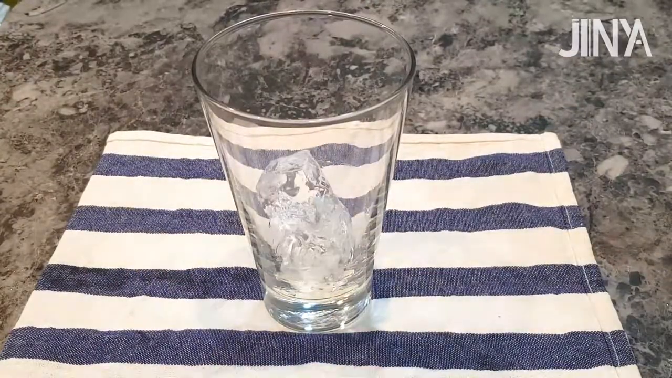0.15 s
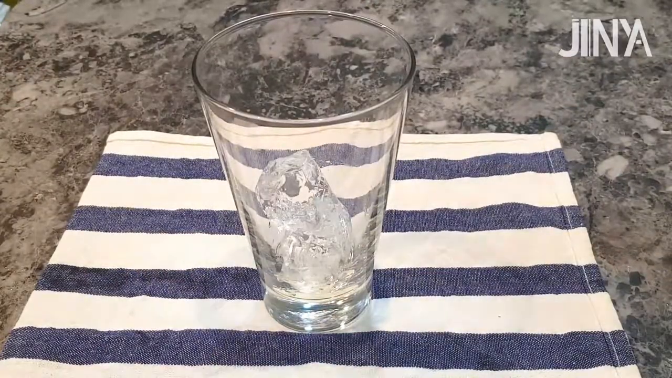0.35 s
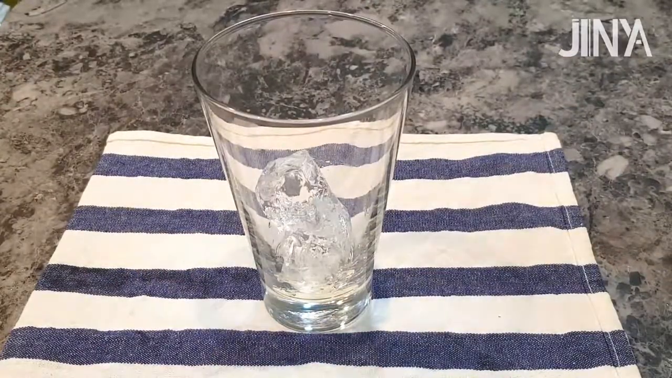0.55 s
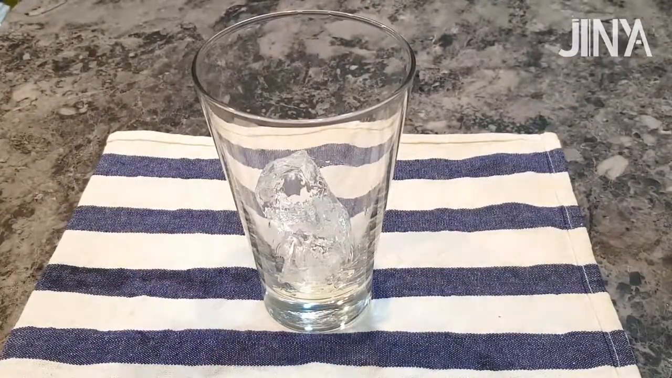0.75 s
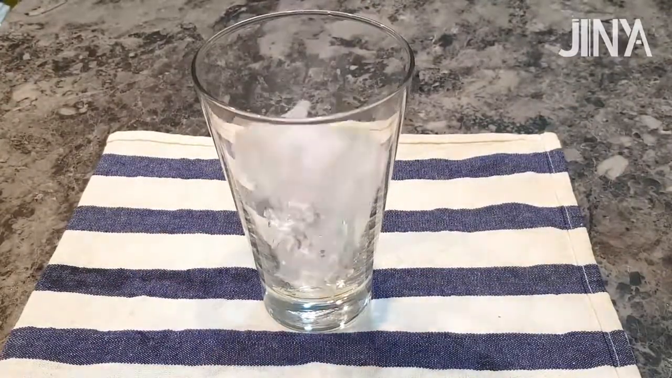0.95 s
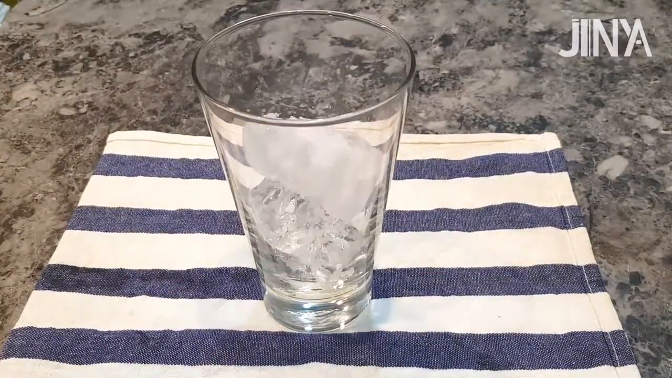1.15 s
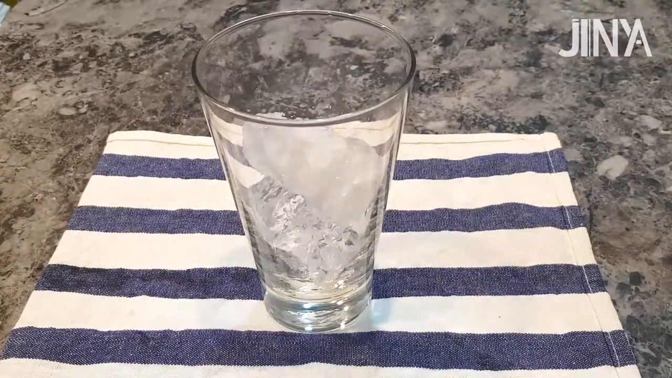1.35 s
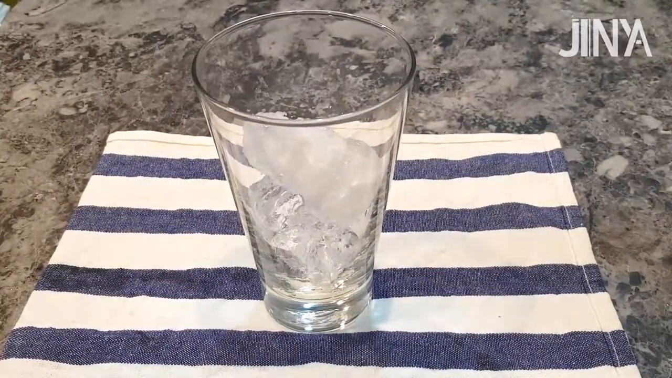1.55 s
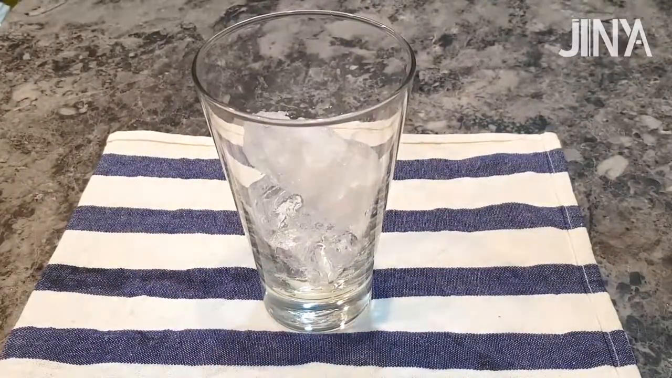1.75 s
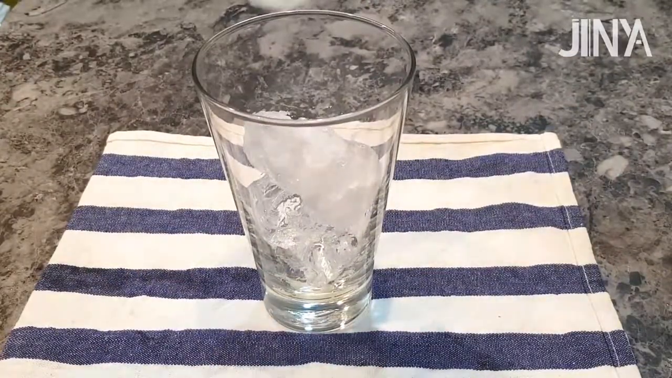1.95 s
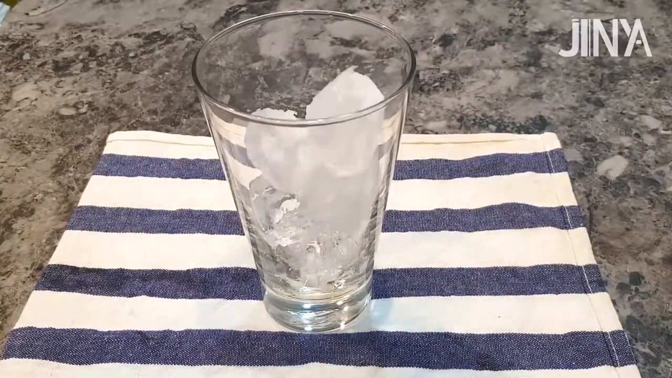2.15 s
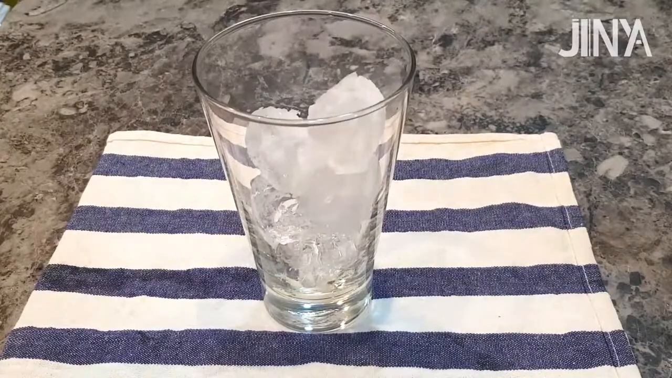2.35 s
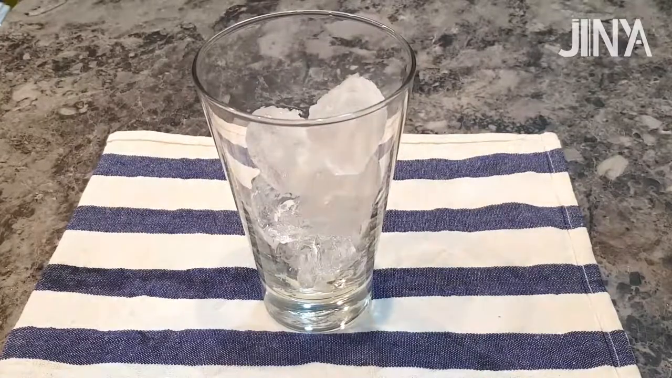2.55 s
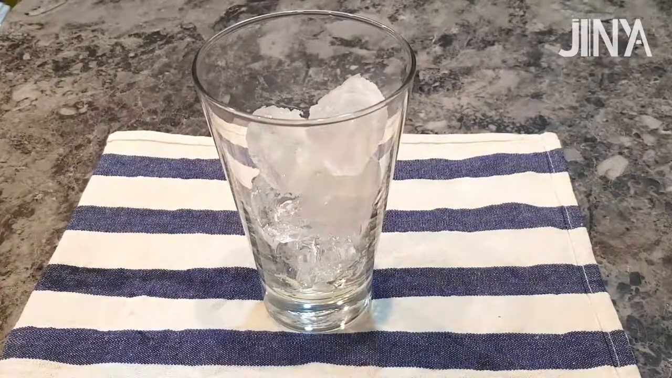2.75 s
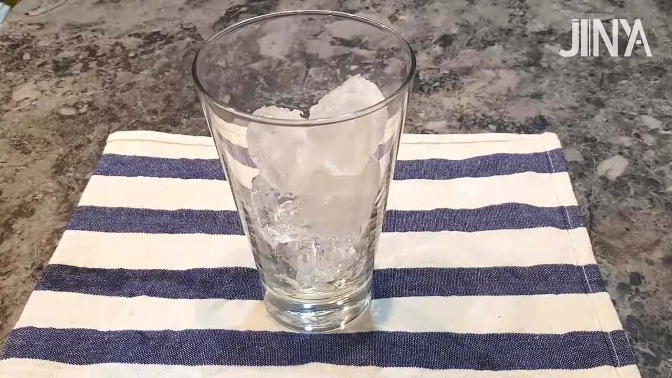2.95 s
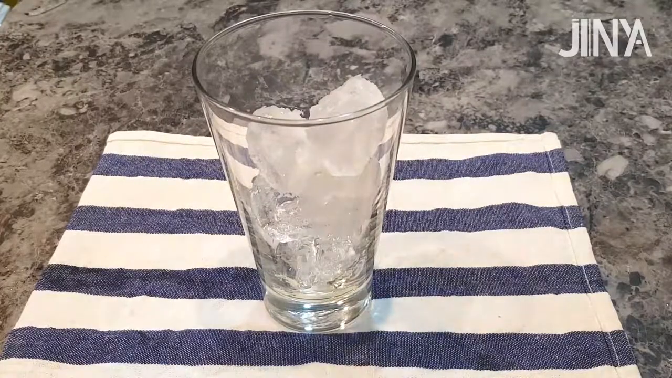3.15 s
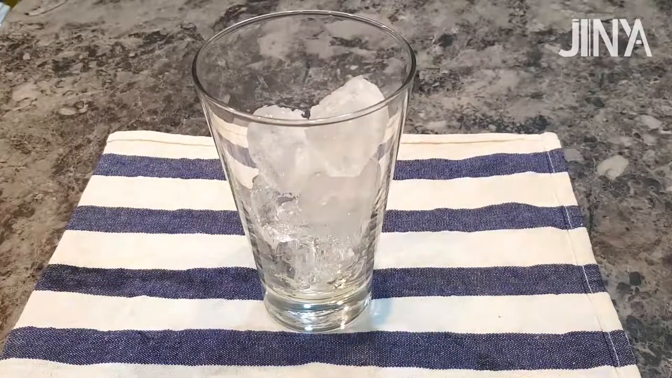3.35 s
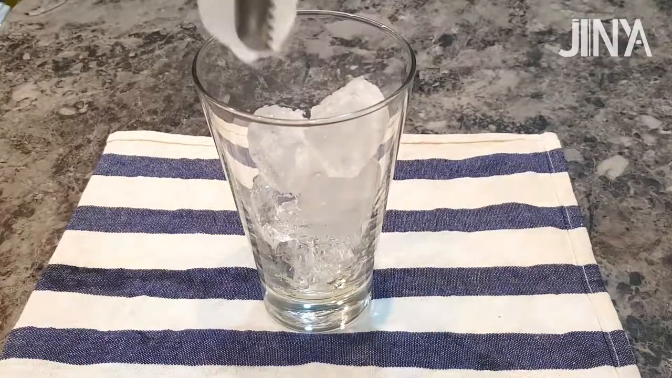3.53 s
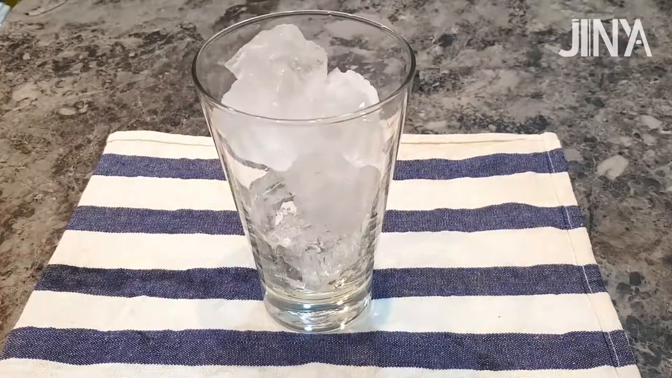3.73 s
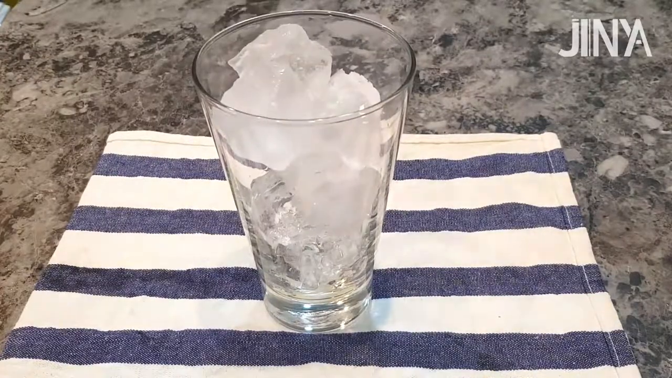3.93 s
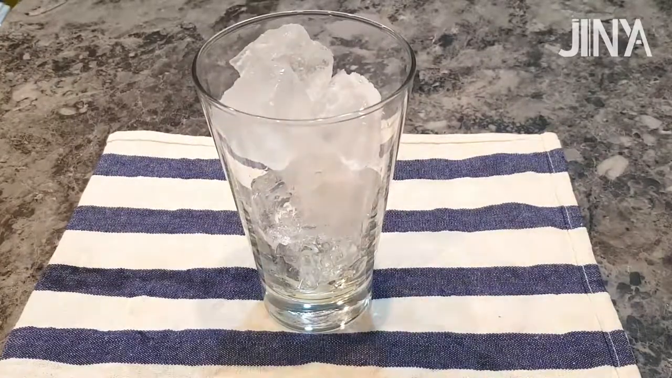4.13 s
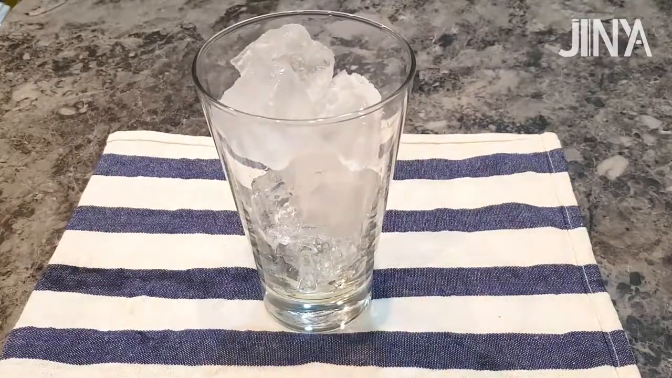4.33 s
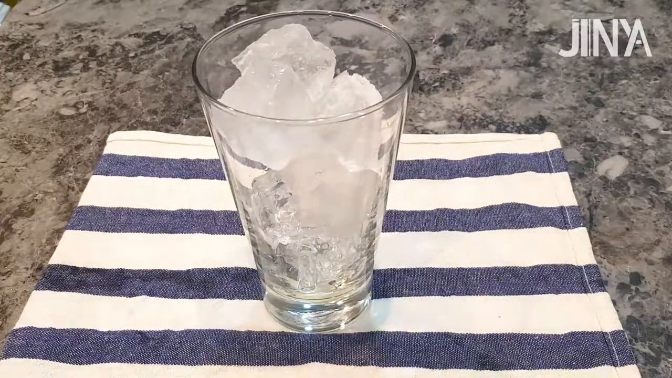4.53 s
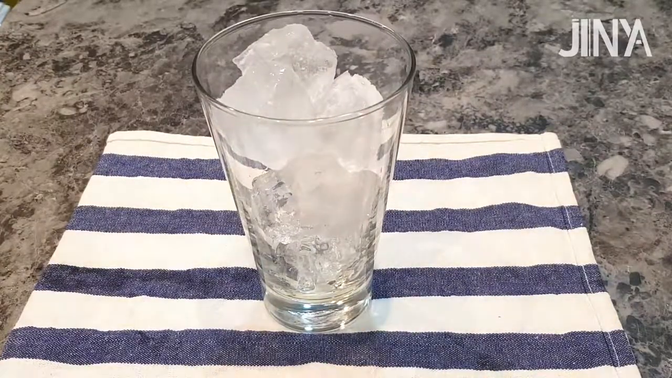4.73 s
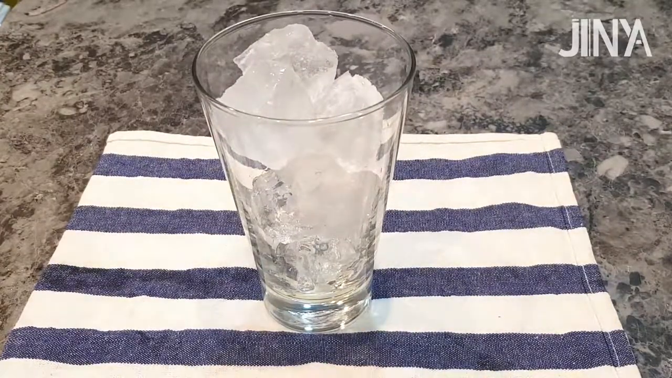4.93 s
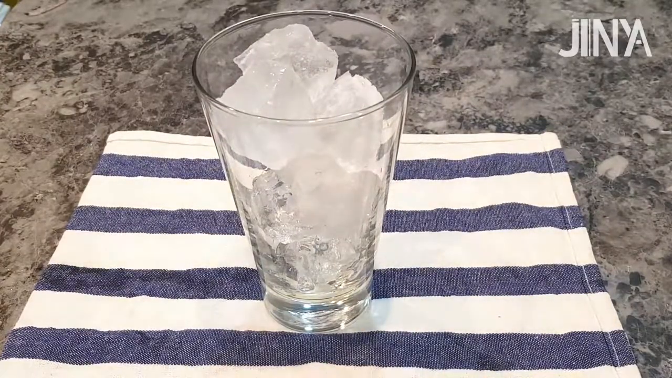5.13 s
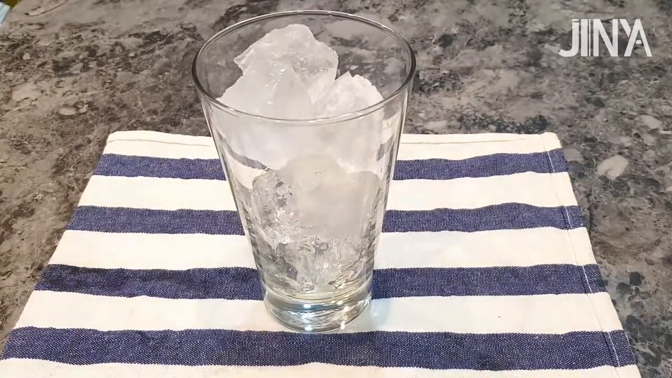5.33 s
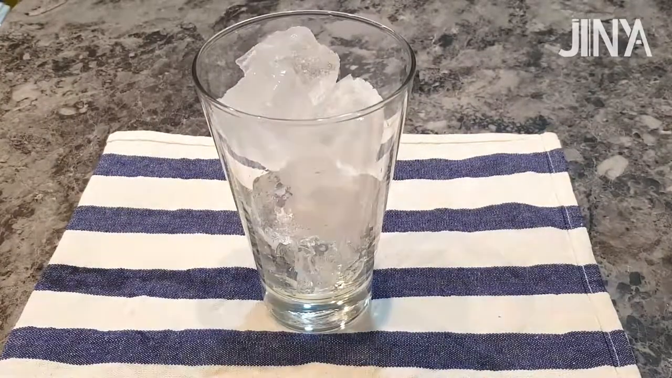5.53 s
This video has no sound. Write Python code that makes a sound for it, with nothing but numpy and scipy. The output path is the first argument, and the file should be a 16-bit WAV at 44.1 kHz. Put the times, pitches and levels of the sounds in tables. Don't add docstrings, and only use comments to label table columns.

```python
import sys
import numpy as np
from scipy import signal
from scipy.fft import rfft, irfft, next_fast_len
from scipy.io import wavfile
from scipy.ndimage import uniform_filter1d, minimum_filter1d, map_coordinates

SR = 44100
rng = np.random.default_rng(int(sys.argv[2]) if len(sys.argv) > 2 else 0)


def materialize(psi):
    bounded = np.clip(np.atleast_2d(psi).T, -1, 1)
    quanta = np.round(bounded * 32767).astype(np.int16)
    wavfile.write(sys.argv[1], SR, quanta)


def voltage_ratio(decibels):
    exponent = np.asarray(decibels, float) / 20
    return 10 ** exponent


N = 250833
TOP_HZ = 16000

# pitch in Hz, time to fall 60 dB in s, left-right difference in dB.
GLASS = [(870, 0.0589, -3), (1691, 0.44, 8), (1760, 0.11, 3), (2460, 0.246, 0), (3800, 0.14, 1),
         (5620, 0.27, -0.5), (6815, 0.084, -6.5), (6984, 0.23, 3), (8060, 0.071, 11.5), (10050, 0.038, 4),
         (10620, 0.076, 5), (11230, 0.1, 7), (12030, 0.051, 6), (13100, 0.036, 8)]
# start in s, free ringing in s, then extra damping by resting ice in dB/s.
BLOWS = [
    (.0338, .3, 0),
    (.9815, .046, 900),
    (1.0273, .015, 60),
    (2.1315, .04, 120),
    (3.675, .06, 200),
    (3.738, .03, 10),
]
# time in s, hiss in dB.
ROOM_HISS = [(0.01, -56.5), (0.35, -64.5), (0.9, -60), (1.35, -60), (1.9, -63), (2.5, -61.5), (2.95, -58.5),
             (3.4, -55.5), (3.9, -55.5), (4.5, -55.5), (5, -55.5), (5.3, -50), (5.6, -57)]


def unit(x):
    return x / np.sqrt(np.mean(x ** 2) + 1e-20)


def along(points, hz):
    f, v = np.transpose(points)
    return np.interp(np.log(hz + 1), np.log(f + 1), v)


def curves(rows):
    s, *cols = np.transpose(rows)
    return np.array([np.interp(np.arange(N) / SR, s, c) for c in cols])


def wobble(rate):
    knots = rng.standard_normal(int(N * rate / SR) + 4)
    return map_coordinates(knots, [np.arange(N) * rate / SR])


def filtered(x, response):
    m = next_fast_len(x.shape[-1] + 4096)
    return irfft(rfft(x, m) * response(np.fft.rfftfreq(m, 1 / SR)), m)[..., :x.shape[-1]]


def rush(spectrum, source):
    # frequency in Hz, left-right likeness from 0 to 1.
    alike = [(130, .97), (290, 0.91), (640, 0.25), (1400, 0.041)]

    def colour(hz):
        turn = np.arccos(np.clip(along(alike, hz), -1, 1)) / 2
        return voltage_ratio(along(spectrum, hz)) * [np.cos(turn), np.sin(turn)]

    mid, side = filtered(source, colour)
    return unit(np.array([mid + side, mid - side]))


def add(out, s, pair, lag=0):
    for ch in range(2):
        out[ch, round(s * SR) + ch * lag:][:pair.shape[1]] += pair[ch]


def background():
    # frequency in Hz, level in dB per Hz; the same for all three.
    fridge_colour = [(42, -29.5), (72, -20.5), (112, 2), (141, -9), (182, -2.5), (340, -14), (560, -14),
                     (900, -58)]
    rumble_colour = [(12, -35), (22, -8.5), (45, -1), (75, -8), (100, -62.5)]
    hiss_colour = [(350, -18.5), (800, 0), (1670, -14), (2340, -9), (3040, -22), (4940, -15.5), (5670, -19),
                   (16000, -31.5)]
    hiss_db = curves(ROOM_HISS)[0]
    mean_db = hiss_db.mean()
    swing_db = hiss_db - mean_db
    hum_db = mean_db + 10.5 + 0.78 * swing_db
    rumble_db = mean_db - 6.5 + 1.5 * swing_db
    noise = rng.standard_normal((3, 2, N))
    hum = voltage_ratio(hum_db + 1.4 * wobble(6)) * rush(fridge_colour, noise[0])
    rumble = voltage_ratio(rumble_db + 2.7 * wobble(6.66)) * rush(rumble_colour, noise[1])
    return (hum + rumble) * voltage_ratio([[.7], [-.7]]) + voltage_ratio(hiss_db) * rush(hiss_colour, noise[2])


def whines():
    # pitch in Hz, level in dB against the hiss.
    motor_tones = [(1760, -18), (2400, -19), (4931, -20), (6444, -27.5)]
    t, hiss_db = np.arange(N) / SR, curves(ROOM_HISS)[0]
    out = np.zeros((2, N))
    for hz, db in motor_tones:
        level_db = hiss_db + db + 4 * np.array([wobble(25), wobble(25)])
        out += voltage_ratio(level_db) * np.sin(2 * np.pi * hz * t + 1.5 * wobble(40))
    return out


def kitchen(x):
    # frequency in Hz, time to fall 60 dB in s.
    decay = [(300, 0.26), (2000, 0.38), (6000, 0.2616), (14000, 0.043)]
    out, step = np.zeros((2, N + SR)), SR // 3
    for start in range(0, N, step):
        hz, t, z = signal.stft(rng.standard_normal((2, SR // 3)), SR, nperseg=256)
        fade = voltage_ratio(-60 * t / along(decay, hz)[:, None])
        tail = signal.istft(z * fade, SR, nperseg=256)[1]
        tail /= np.linalg.norm(tail[0])
        add(out, start / SR + 0.0037, signal.fftconvolve(x[:, start:start + step], tail, axes=1))
    return out[:, :N]


def swells(rows):
    t, levels = np.arange(N) / SR, []
    for s, body_db, crisp_db, rise, fall in rows:
        down_db = 24 * np.maximum((s - t) / rise, (t - s) / fall)
        levels.append([body_db - down_db, crisp_db - 1.226 * down_db])
    return np.max(levels, axis=0)


def bag(spans, crackle_db, patchy_db, pan_db):
    # frequency in Hz, level in dB per Hz; the same for both.
    body_colour = [(290, -11), (500, 0.5), (829, -1), (1240, 4), (1520, -2.5), (2020, 6), (4500, -26.5),
                   (5850, -73)]
    crisp_colour = [(2060, -18), (3500, -0.5), (4100, -1), (6530, -5.5), (9300, -7), (12300, -3.5),
                    (14000, -3.5), (15700, -7)]
    body_db, crisp_db = swells(spans)
    rough = voltage_ratio(crackle_db * wobble(250)) * rng.standard_normal((2, N))
    z = signal.stft(rough, nperseg=256)[2]
    patches = uniform_filter1d(rng.standard_normal(z.shape[1:]), size=2, axis=0)
    patches = unit(uniform_filter1d(patches, size=7, axis=1))
    creases = signal.istft(z * voltage_ratio(patchy_db * patches), nperseg=256)[1][:, :N]
    film = voltage_ratio(body_db) * rush(body_colour, creases) + voltage_ratio(crisp_db) * rush(crisp_colour, creases)
    return film * voltage_ratio([[pan_db], [-pan_db]])


def rummage():
    # peak in s, body in dB, crisp top in dB, rise in s, fall in s (over 24 dB); the same for both.
    squeezes = [(0.405, -43, -43, 0.01, 0.054), (0.535, -42.5, -44, 0.034, 0.055),
                (0.572, -38.5, -43.5, 0.024, 0.095), (0.675, -38, -43, 0.0066, 0.09),
                (0.75, -50, -44, 0.19, 0.089), (1.46, -40.5, -52, 0.011, .08),
                (1.497, -50, -35, 0.011, 0.11), (1.55, -34, -34, 0.11, 0.059),
                (1.63, -38, -48, 0.19, 0.069), (1.738, -45, -62.5, 0.033, 0.084),
                (2.668, -41.5, -47.5, 0.023, 0.097), (2.77, -42, -44.5, 0.1, 0.21),
                (2.86, -45.5, -47, 0.13, 0.36), (3.035, -39, -44, 0.13, 0.075)]
    slides = [(4.402, -37, -51, 0.0049, 0.23), (4.44, -42.5, -46.5, 0.045, 0.21),
              (4.605, -36, -40.5, 0.03, 0.13), (4.708, -44, -37, 0.026, 0.24),
              (4.79, -32, -29, 0.091, 0.15), (5.05, -44, -41.5, 0.0079, 0.17),
              (5.18, -37.5, -39.5, 0.021, 0.087), (5.228, -33, -33, 0.014, 0.11),
              (5.3, -33.5, -29.5, 0.14, 0.068), (5.33, -42.5, -43.5, 0.066, 0.33),
              (5.48, -43, -47, 0.03, 0.16)]
    film = bag(squeezes, crackle_db=4.5, patchy_db=4.5, pan_db=3.0)
    ice = bag(slides, crackle_db=1.5, patchy_db=3.5, pan_db=1.0)
    return film + ice


def burst(t, hz, cycles, t60):
    puff = voltage_ratio(-60 * t / t60) * rng.standard_normal((2, len(t)))
    puff[:, :4] *= 2.5
    puff[1] += .5 * puff[0]
    loss = voltage_ratio(-60 * hz / cycles / SR)
    rung = signal.lfilter([1], [1, -2 * loss * np.cos(2 * np.pi * hz / SR), loss ** 2], puff)
    return rung / np.max(np.abs(rung), axis=1, keepdims=True)


def contacts():
    # start in s, knock in dB, knock in Hz, tick in dB, tick in Hz.
    touches = [(0.027, -24, 1700, -18, 6950), (0.034, -11, 1770, -5, 11400), (0.138, -21, 1470, -58, 6750),
               (0.9814, -24, 1730, 0.5, 11860), (1.0278, -3, 1760, -5, 13100),
               (1.1033, -14, 887, -27, 7150), (1.118, -29, 2400, -21.5, 6900),
               (1.128, -28, 833, -28, 12200), (1.249, -48, 726, -34.5, 13000),
               (2.076, -49, 1900, -36, 13000), (2.088, -52, 1840, -33.5, 10000),
               (2.115, -21, 2350, -25, 13000), (2.1188, -17, 1620, -24, 14400),
               (2.1317, -14.5, 1710, -8.5, 10200), (2.1716, -19, 1840, -15.5, 10400),
               (3.6264, -36, 720, -28.5, 5580), (3.657, -7.5, 1335, -20, 10500),
               (3.6743, -6.5, 1810, -2, 13600), (3.6823, -18, 3640, -7, 10700),
               (3.739, -10, 1830, -6, 6300)]
    # start in s, knock in dB, knock in Hz, tick in dB.
    knocks = [(0.5645, -24, 2160, -24.5), (0.5836, -23.5, 716, -26.5), (0.6745, -8.5, 1700, -31),
              (0.7017, -22, 1250, -38), (0.7488, -26.5, 1440, -28), (0.782, -22, 1420, -36),
              (1.5039, -22, 2280, -4), (1.5324, -8, 2250, -25.5), (1.5519, -28, 3060, -11.5),
              (1.6135, -24, 2200, -16.5), (1.6361, -29, 1260, -19.5), (1.7495, -22.5, 2200, -53),
              (1.7869, -23.5, 2490, -36), (2.6677, -22.5, 1200, -31), (2.7768, -21, 2850, -42),
              (2.8048, -27.5, 1100, -37), (2.8328, -23.5, 3750, -30), (2.8635, -18, 1270, -26),
              (3.0162, -17.5, 3570, -25.5), (3.0285, -17.5, 1246, -33), (4.4148, -8, 2310, -18.5),
              (4.445, -20, 1080, -17), (4.6028, -27, 1160, -19.5), (4.7186, -19, 2250, -15),
              (4.8022, -18.5, 3150, -25), (5.1767, -19, 760, -18), (5.2235, -26, 2540, -17.5),
              (5.2569, -21, 2270, -24), (5.295, -17, 2050, -27), (5.391, -25.5, 4850, -30.5)]
    # start in s, knock in dB, tick in dB.
    creases = [(0.4027, -35.5, -43), (0.411, -44, -25.5), (0.4214, -42, -26.5), (0.5313, -39, -28),
               (0.5404, -28.5, -25.5), (0.5781, -41, -24), (0.6003, -31, -22), (0.6662, -54, -50),
               (0.715, -41, -22.5), (0.7333, -21.5, -22), (1.455, -25.5, -22.5), (1.464, -33, -20),
               (1.491, -34, -32), (1.5701, -35, -32), (1.605, -28, -50), (1.526, -20, -40),
               (1.544, -28, -27), (1.558, -30, -28), (1.598, -23, -48), (1.632, -43, -24),
               (1.714, -36, -54), (0.572, -35, -27), (0.692, -28, -48), (4.399, -41.5, -34),
               (4.562, -40, -36), (5.047, -28.5, -26.5), (1.651, -29, -41), (1.7245, -25, -29),
               (1.733, -29.5, -44.5), (2.658, -51.5, -17.5), (2.698, -30.5, -38), (2.732, -34, -52),
               (2.7595, -29, -47), (2.767, -32, -45), (2.82, -49, -27), (2.8932, -30, -25),
               (2.907, -50, -25), (2.923, -51, -28), (2.9299, -35, -42), (3.013, -33, -49),
               (3.0597, -39, -39), (2.7524, -30, -45), (2.745, -34, -48), (2.7725, -27.5, -45),
               (2.942, -31.5, -46), (2.6736, -29, -45), (4.6106, -26, -40.5), (2.693, -33, -48)]
    # time in s, left-right difference in dB.
    places = [(0, 2.5), (.4, 11), (1.0, 1.5), (1.5, 9), (2.1, 2), (2.8, 10), (3.6, -2.5), (5.69, 8)]
    out, t = np.zeros((2, N + SR)), np.arange(SR // 30) / SR
    pan_db = curves(places)[0]
    in_bag = knocks + [(s, knock_db, 2110, tick_db) for s, knock_db, tick_db in creases]
    pitch = np.minimum(11300 * np.exp(0.23 * rng.standard_normal(len(in_bag))), TOP_HZ)
    every = touches + [(*row, hz) for row, hz in zip(in_bag, pitch)]
    for s, knock_db, knock_hz, tick_db, tick_hz in every:
        knock = 0.55 * burst(t, knock_hz, cycles=17, t60=0.015) + .5 * burst(t, 2300, cycles=7.6, t60=0.0099)
        tick = 0.44 * burst(t, tick_hz, cycles=12.2, t60=0.00766) + 0.69 * burst(t, 12150, cycles=1.4, t60=0.02)
        side = voltage_ratio(pan_db[round(s * SR)] * np.array([[.5], [-.5]]))
        snap = (voltage_ratio(knock_db) * knock + voltage_ratio(tick_db) * tick) * side
        add(out, s + .0002, snap, lag=22)
    small = lambda hz: (hz / 550) ** 2 / (1 + (hz / 550) ** 2)
    return filtered(out[:, :N], small)


def lone_tones():
    # start in s, level in dB, pitch in Hz, time to fall 60 dB in s.
    damped_tones = [(0.052, -23, 2460, 0.22), (0.062, -25, 870, 0.03), (.138, -28, 870, 0.036),
                    (0.584, -30.5, 445, 0.026), (.981, -20.5, 425, 0.012), (4.602, -29.5, 1073, 0.066),
                    (1.103, -18.5, 855, 0.039), (1.128, -23.5, 870, 0.029), (2.115, -27, 823, 0.06),
                    (2.124, -33, 234, 0.059), (2.208, -34, 860, 0.04), (2.666, -21, 440, 0.013),
                    (3.677, -23.5, 194, 0.033), (5.176, -22, 507, 0.037), (5.19, -17, 486, 0.02),
                    (5.182, -31, 242, 0.24), (5.222, -29, 1654, 0.16), (5.293, -28.5, 252, 0.048),
                    (5.312, -27, 256, 0.033), (1.036, -24, 15330, 0.035), (3.675, -32, 15300, .08),
                    (.036, -31.5, 2930, 0.19), (.034, -34, 4600, .1), (.034, -37, 7600, 0.067),
              (.034, -35.5, 8543, 0.083), (.034, -33, 5270, 0.073), (.034, -36, 3220, 0.047),
              (.034, -35.5, 11460, .1), (2.132, -32, 5620, 0.13), (5.223, -34.5, 3324, 0.076),
              (5.223, -33, 4460, .05), (5.257, -33, 5300, 0.074), (5.223, -25, 6030, 0.042),
              (3.658, -23.5, 860, 0.042), (1.504, -15, 5810, 0.011), (.138, -31.5, 1896, 0.056),
              (.138, -33, 2120, 0.057), (.982, -20, 13730, .03), (.982, -46, 4511, .1),
              (.982, -38, 14450, .07), (1.028, -23, 4170, .06), (1.028, -34, 3000, 0.083),
              (1.036, -28, 13970, .035), (1.036, -34, 6848, 0.034), (1.13, -33, 12000, 0.042),
              (2.115, -31, 2473, 0.071), (2.132, -33, 12800, .05), (2.132, -36, 15300, .04),
              (2.172, -38, 15630, .04), (2.172, -31, 10500, 0.036), (2.176, -37, 13730, 0.044),
              (2.205, -44, 15200, .03), (3.683, -30, 3460, 0.088), (3.683, -33, 8000, 0.11),
              (3.683, -29.5, 12810, 0.1), (3.675, -29, 13770, .06), (3.683, -30, 10900, 0.068),
              (.584, -23, 13200, .02), (.675, -23.5, 4440, 0.024), (1.491, -29, 12300, 0.032),
              (1.497, -27, 12300, 0.038), (1.553, -19.5, 12300, 0.024), (4.415, -20, 2240, 0.033),
              (4.446, -26, 9200, 0.022), (4.446, -25, 13100, 0.018), (4.603, -35, 2090, 0.049),
              (2.802, -41, 12200, 0.025), (3.0285, -23, 2230, 0.023), (3.016, -27.5, 4110, 0.023),
                    (1.0276, -12.5, 1850, 0.034), (1.0311, -18.5, 2130, 0.024), (1.0341, -15.5, 1570, 0.021),
                 (1.0371, -17.5, 1870, 0.017), (1.0331, -20, 1310, 0.022), (1.0276, -16.5, 878, 0.045),
                 (1.0971, -34, 1500, 0.046), (1.1281, -28.5, 1760, 0.075), (2.1141, -24.5, 1650, 0.064),
                 (2.1211, -30, 2100, 0.031), (2.1241, -27.5, 1750, 0.036), (2.1261, -31, 1290, 0.027),
                 (2.1581, -36, 1750, 0.035), (2.1711, -30, 2600, 0.033), (2.2581, -41, 834, 0.031),
                 (3.6841, -25, 1800, 0.074), (3.6841, -24.5, 1723, 0.074), (3.6841, -33, 8183, 0.096),
                 (3.6831, -24.5, 6126, 0.038), (3.7391, -28.5, 2660, 0.034), (5.4691, -33, 787, 0.023),
                 (3.0291, -22, 3340, .012), (3.0291, -24, 4700, 0.012), (2.8, -29, 1400, 0.027),
                 (3.7391, -34, 2460, 0.28)]
    out = np.zeros((2, N + SR))
    for s, db, hz, t60 in damped_tones:
        t, knots = np.arange(int(SR * t60) + 64) / SR, rng.standard_normal(64)
        drift = 1.8 * hz / 9000 * np.interp(t * 150, np.arange(64), knots)
        apart = knots[-1] * min(hz / 3000, 1) * np.array([[.5], [-.5]])
        fade = voltage_ratio(db - 60 * t / t60) * (1 - np.exp(-t / 0.0012))
        tone = fade * np.sin(2 * np.pi * hz * t + drift + apart)
        add(out, s, tone * voltage_ratio([[1.5], [-1.5]]))
    return out[:, :N]


def strengths():
    # level in dB, then dB per unit of depth in the glass,
    # of edge sharpness, of turn round the wall.
    shape = np.array([(-4.5, 1, -10, -5), (-0.5, 6, 6.5, 3.5), (5, -7, 1, -2.5), (0.5, -3.5, -2, -1.5),
                      (-5.5, -5, 6.5, -8.5), (-3.5, -9, 0.1, 7.5), (3, 4.5, 1, 0.5), (0.9, 7, -0.5, -3.5),
                      (1.5, -6.5, 1, 1.5), (1.5, -3.5, -7.5, 8), (-4, -6, 11.5, 4), (-4.5, 7, -2.5, -2),
                      (5.5, 11, 2, 1.5), (10.5, 7, 1.5, 1.5)])
    # strength in dB, then depth, edge sharpness and turn, about -1.3 to 1.7.
    landing = np.array([(-29, 1.72, -0.17, 0.18), (-28, 0.19, 1.08, 0.274), (-33.5, 0.23, -1.26, -0.98),
                        (-36, 0.18, -1.16, 0.92), (-30.5, -0.88, 0.6, -0.03), (-42, -1.15, -0.02, -0.48)])
    # blow in s, mode in Hz, change in dB.
    held = [(.9815, 6984, -5), (.9815, 2460, -1), (.9815, 10620, 3), (1.0273, 1691, -6),
            (1.0273, 870, -1.5), (1.0273, 6984, -5), (1.0273, 11230, -5), (1.0273, 3800, 3),
            (2.1315, 6815, -2), (2.1315, 6984, -2), (2.1315, 11230, -7), (2.1315, 1691, -2),
            (3.675, 5620, -3), (3.675, 6984, 1), (3.675, 8060, -5), (3.675, 3800, 2), (3.738, 3800, 5.5),
            (3.738, 8060, 0.5), (3.738, 1760, -6.5), (3.738, 5620, 0.5)]
    hz, when = np.array(GLASS)[:, :1], np.array(BLOWS)[:, 0]
    held_db = 0
    for s, mode_hz, db in held:
        same_mode = np.abs(np.log(hz / mode_hz)) < .012
        held_db = held_db + db * same_mode * (np.abs(when - s) < .01)
    return shape[:, :1] + landing[:, 0] + shape[:, 1:] @ landing[:, 1:].T + held_db


def chatter():
    # start in s, level in dB, fast fall in dB/s,
    # lingering level in dB, slow fall in dB/s.
    spells = [
        (0.031, -28.5, 224, -58, 296),
        (0.98, -37.5, 269.5, -55, 106.5),
        (1.027, -28, 700, -49.5, 114),
        (2.113, -46, 180, -57, 140),
        (3.656, -38, 137, -70, 200),
        (3.737, -42, 502, -55, 149.5),
    ]
    # wall modes in dB, dull clatter in dB, top in Hz.
    balance = [(-0.5, -4.5, 13160), (-0.5, 1.5, 15800), (0.5, -1.5, 15800), (2, 1.5, 15800),
               (-1.5, 1, 15700), (-0.5, -2, 14000)]
    # depth from 0 to 1, width in Hz.
    hollow = [(.95, 1100), (.5, 700), (.85, 600), (.85, 650), (.85, 650), (.85, 600)]
    out, bounces = np.zeros((2, N + SR)), voltage_ratio(2.62 * wobble(160)) * rng.standard_normal((2, N))
    hz, strength_db = np.array(GLASS)[:, :1], strengths()
    t = np.arange(SR // 3) / SR
    ends = [row[0] for row in spells[1:]] + [N]

    fine_hz, fine_width, fine_share = rng.uniform(974, TOP_HZ, (70, 1)), 66, 0.54
    grid = np.arange(SR // 2, step=8)
    loss = 1j * grid * fine_width
    comb = np.sum(loss / (fine_hz ** 2 - grid ** 2 + loss), axis=0)

    for k, (s, db, fast, linger_db, slow) in enumerate(spells):
        start = round(s * SR)
        wall_db, dull_db, top_hz = balance[k]
        depth, width = hollow[k]
        fall = voltage_ratio(np.maximum(db - fast * t, linger_db - slow * t))
        piece = fall * (t < ends[k] + .01 - s) * bounces[:, start:start + SR // 3]
        share = voltage_ratio(0.48 * (strength_db[:, k:k + 1] - strength_db[:, k].max()))
        share = share * (-1) ** np.arange(len(hz))[:, None]

        def response(f):
            modes = (1j * f * 0.028 * hz / (hz ** 2 - f ** 2 + 1j * f * 0.026 * hz)) ** 2
            wall = np.sum(share * modes, axis=0)
            dull = 0.57 * (f / 2200) / (1 + (f / 2200) ** 1.73) / (1 + (f / 6500) ** 3)
            dull = dull + 0.055 * (f / 12000) ** 3
            fine = 1 - fine_share + 2 * fine_share * np.interp(f, grid, comb)
            dip = 1 - depth * np.exp(-((f - 9430) / width) ** 4)
            return (voltage_ratio(wall_db) * wall + voltage_ratio(dull_db) * dull * fine) * dip / (1 + (f / top_hz) ** 40)

        add(out, start / SR, filtered(piece, response))
    return voltage_ratio(22.0) * out[:, :N] * voltage_ratio([[2.2], [-2.2]])


def glass():
    loose = [0.458, 0.85, 0.72, 0.85, 1.04, 1.4]
    out, t = np.zeros((2, N + SR)), np.arange(SR * 2 // 5) / SR
    table = np.array(GLASS)[:, :, None]
    hz, t60, pan_db = table[:, 0], table[:, 1], table[:, 2]
    side = voltage_ratio(pan_db * [[[.5]], [[-.5]]])
    strength_db = strengths()
    for k, (s, free, damping) in enumerate(BLOWS):
        apart = rng.uniform(-1.4, 1.4, (2, *hz.shape)) * np.clip(hz / 4500, .25, 1)
        phase = 2 * np.pi * rng.random(hz.shape) + apart
        knots = rng.standard_normal((2, len(hz), 64))
        wander = np.array([[np.interp(t * 110, np.arange(64), row) for row in part] for part in knots])
        shake = wander * loose[k] * (hz / 7000) ** 0.93
        fade_db = -60 * t / t60 - damping * np.maximum(t - free, 0) + 5.1 * shake[0]
        tone = np.sin(2 * np.pi * hz * t + phase + 1.53 * shake[1])
        ring = side * voltage_ratio(strength_db[:, k, None] + fade_db) * tone
        add(out, s, ring.sum(axis=1) * (1 - np.exp(-t / 0.0015)))
    return out[:, :N]


def scene():
    ring, hits = glass(), contacts() + lone_tones() + chatter()
    room = kitchen(voltage_ratio(-11.5) * ring + voltage_ratio(-13) * hits)
    return ring + hits + room + rummage() + background() + whines()


def starved(x):
    floor_hz, quiet_db = 5000, -51
    hz, _, z = signal.stft(x, SR, nperseg=2048)
    high = hz[:, None] > floor_hz
    power = np.sum(np.abs(z) ** 2, axis=0) * high + 1e-20
    band_db = 10 * np.log10(np.abs(uniform_filter1d(power, size=8, axis=0)))
    margin_db = np.where(power.sum(axis=0) < voltage_ratio(2 * quiet_db), -1.5, -7)
    weak = (band_db < margin_db + uniform_filter1d(band_db, size=100, axis=0)) & high
    kept = minimum_filter1d(1. * ~weak, size=4, axis=0)
    thin = signal.istft(z * kept, nperseg=2048)[1][:, :N]
    treble = filtered(thin, lambda f: f > floor_hz / 2)
    level = np.abs(uniform_filter1d(np.sum(treble ** 2, axis=0), size=128))
    reach = int(.012 * SR)
    coming = -minimum_filter1d(-level, size=reach, origin=-(reach // 2))
    hush = (coming > voltage_ratio(2 * 19) * level) & (level < voltage_ratio(2 * quiet_db))
    return thin - 0.97 * treble * uniform_filter1d(1. * hush, size=200)


def splice():
    start, gap, cut, back = 5.415, 0.052, 0.004, 0.018
    edges = start + np.array([0, cut, gap - back, gap])
    return voltage_ratio(-58 * np.interp(np.arange(N) / SR, edges, [0, 1, 1, 0]) ** 1.7)


def roll_off(x):
    return signal.sosfilt(signal.butter(12, 16990, fs=SR, output="sos"), x)


def record(dry):
    soft = dry / (1 + np.abs(dry / .9) ** 6) ** (1 / 6)
    limited = filtered(soft, lambda hz: voltage_ratio(-.05 * np.maximum(hz - TOP_HZ, 0)))
    return roll_off(starved(limited) * splice())


dry = scene()
out = record(dry)
materialize(out)
```